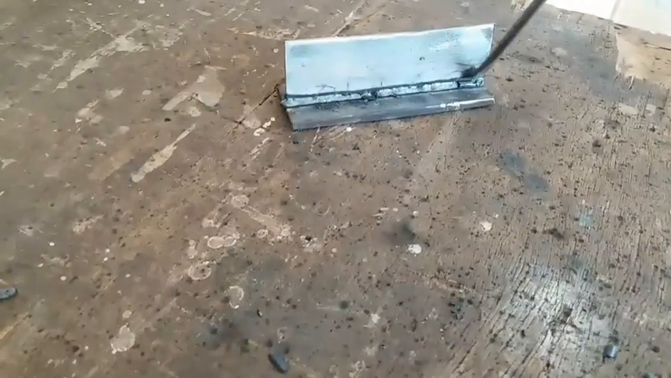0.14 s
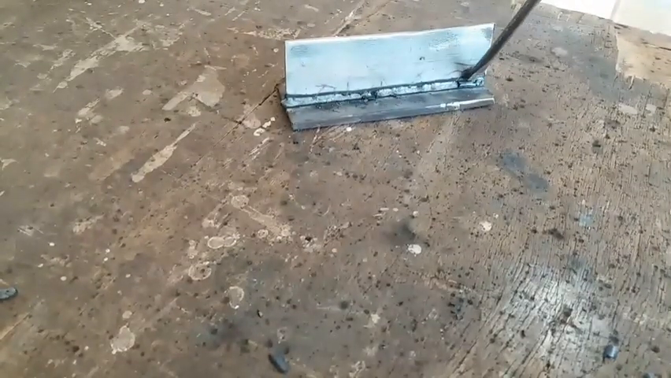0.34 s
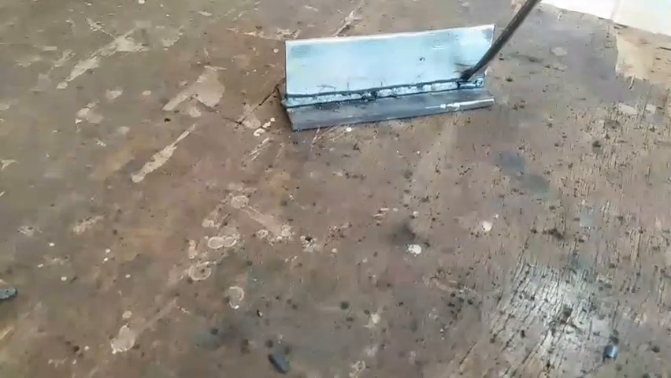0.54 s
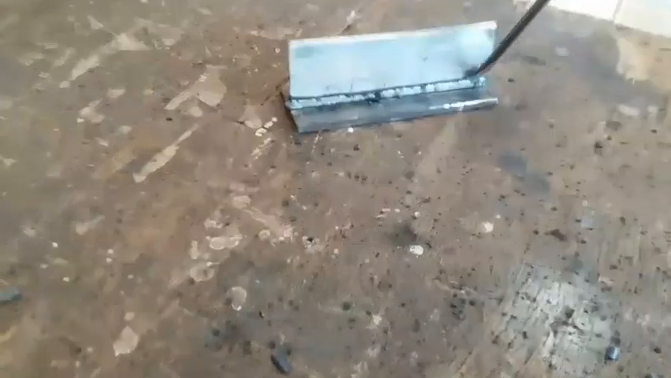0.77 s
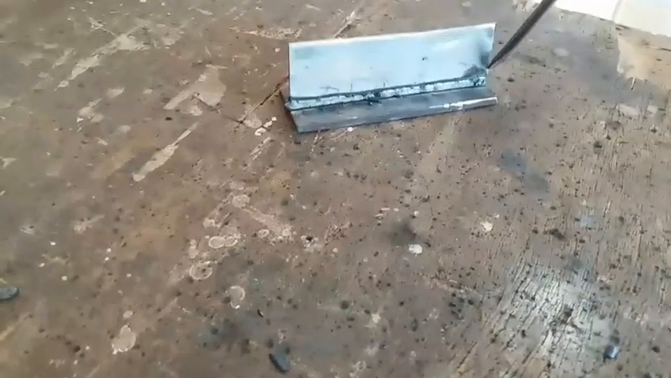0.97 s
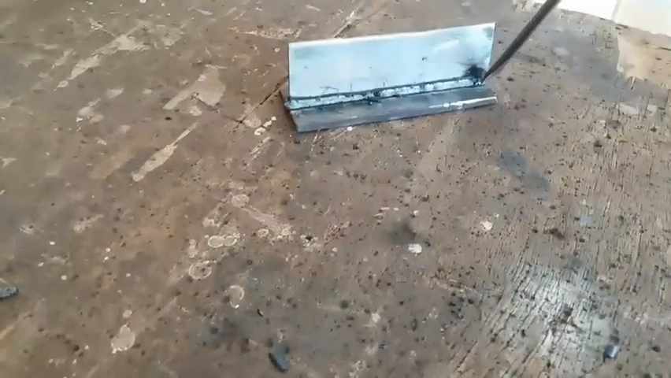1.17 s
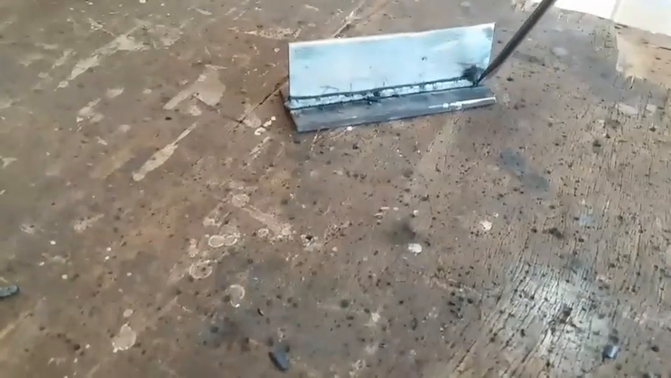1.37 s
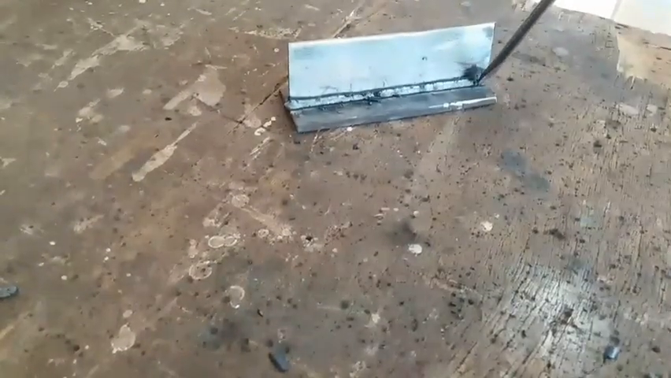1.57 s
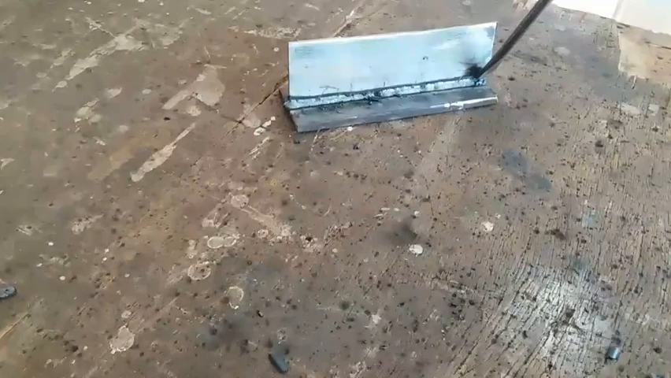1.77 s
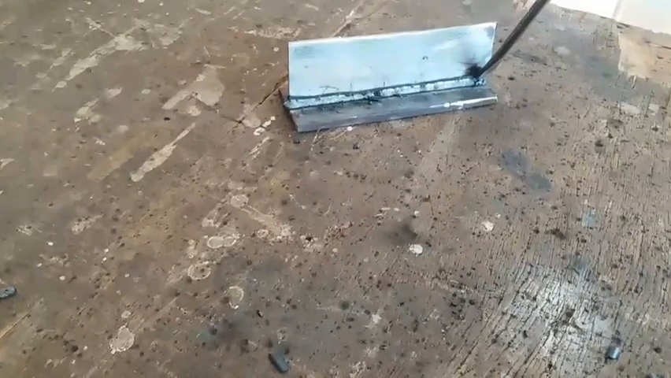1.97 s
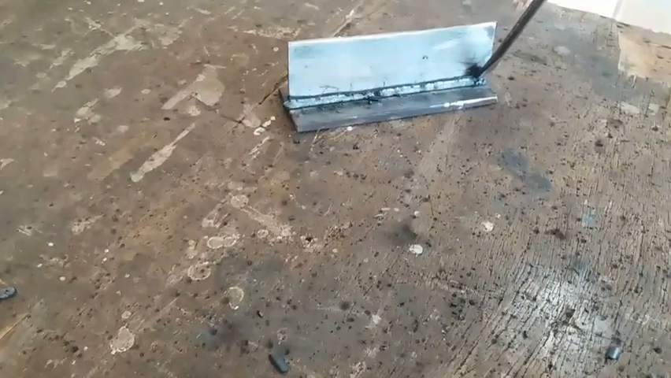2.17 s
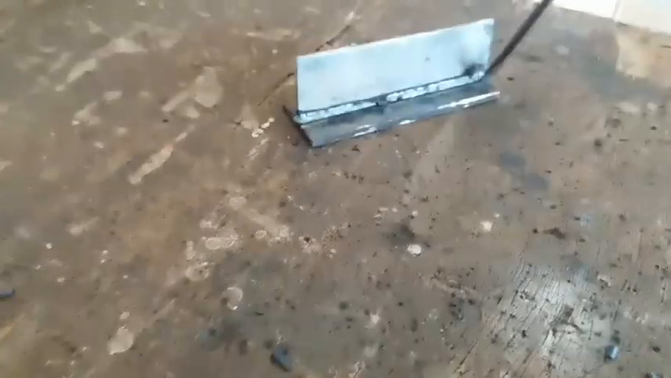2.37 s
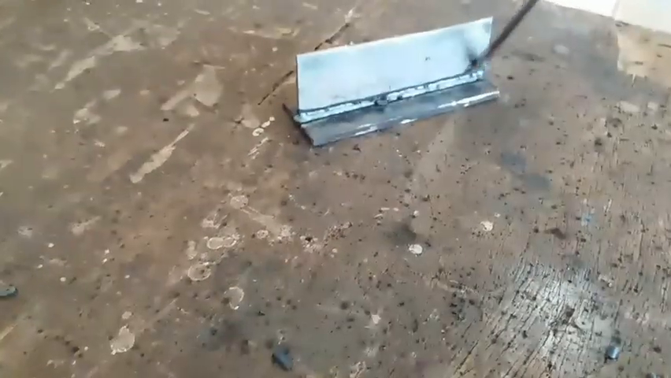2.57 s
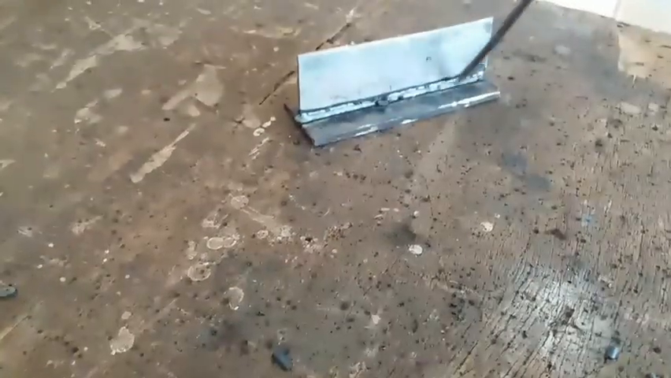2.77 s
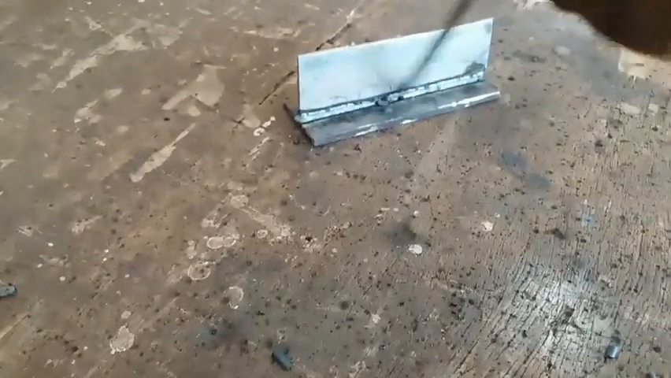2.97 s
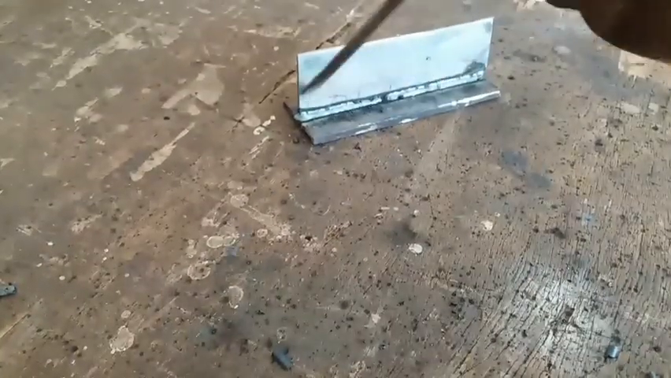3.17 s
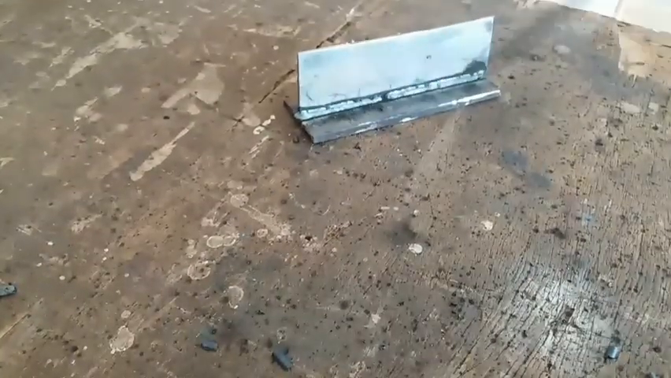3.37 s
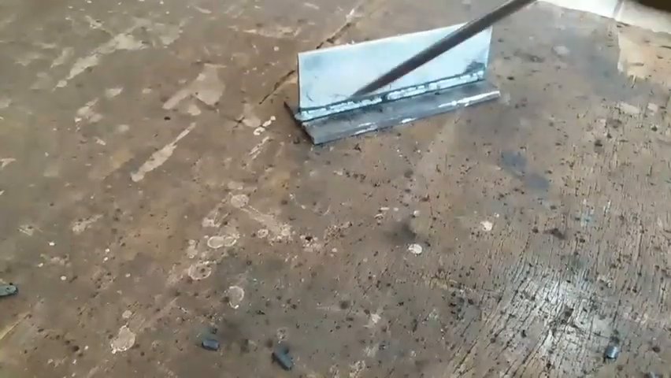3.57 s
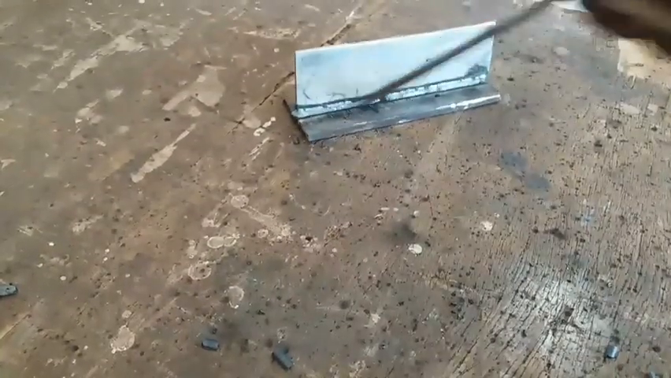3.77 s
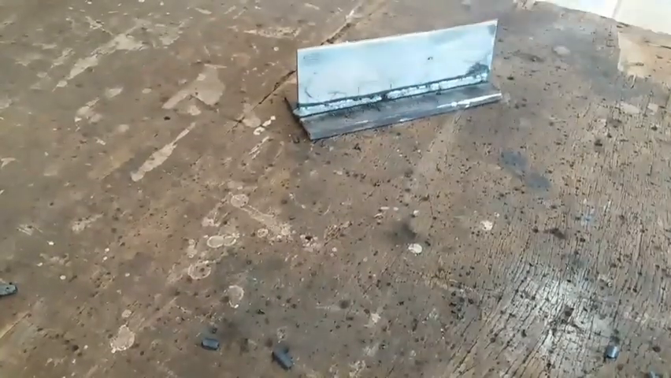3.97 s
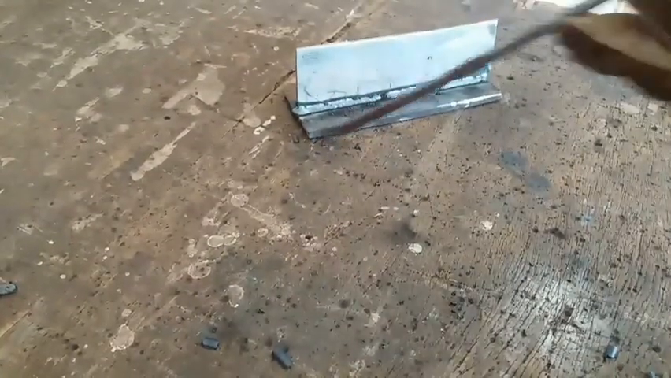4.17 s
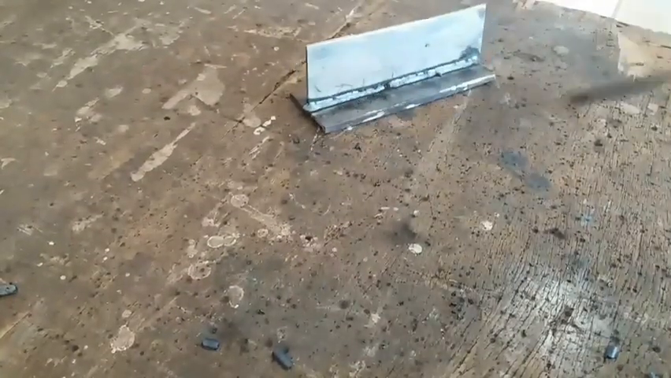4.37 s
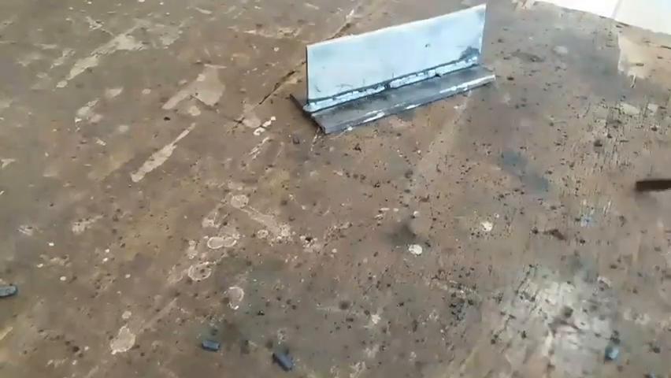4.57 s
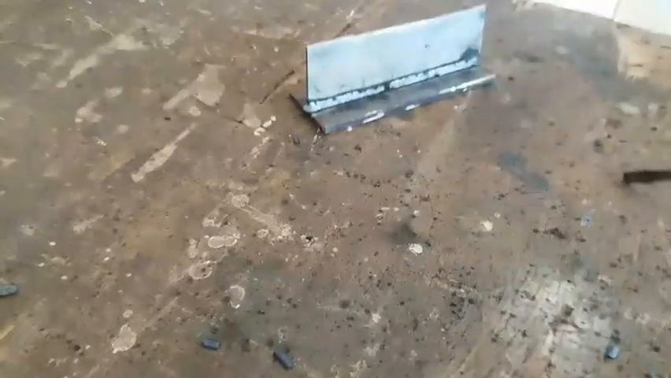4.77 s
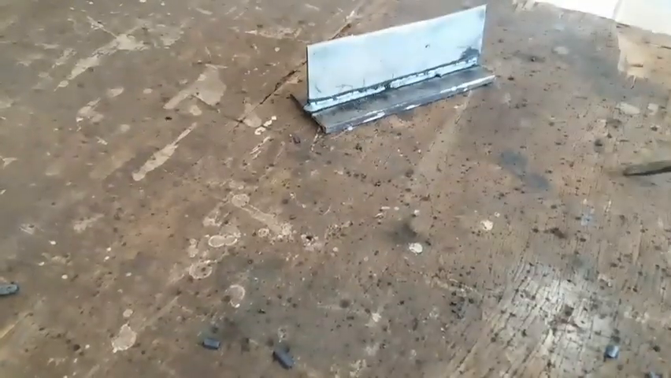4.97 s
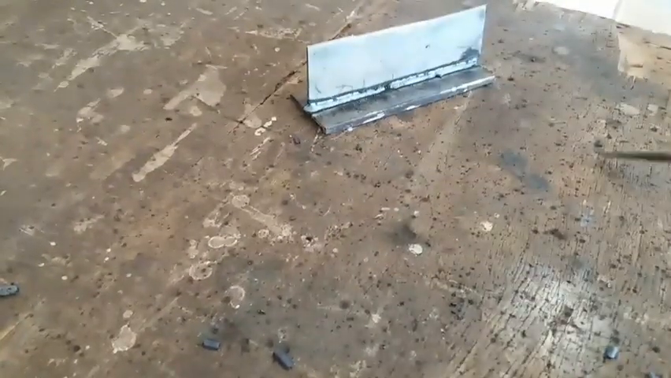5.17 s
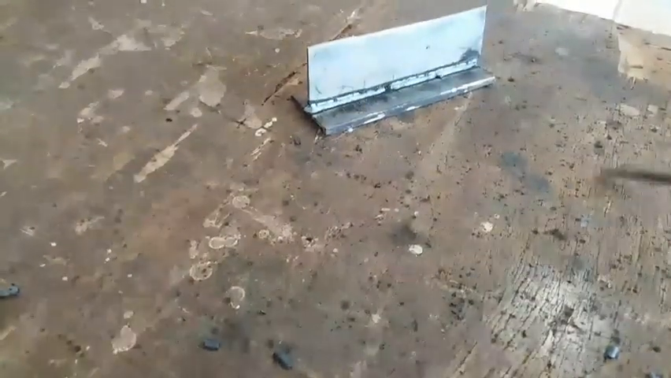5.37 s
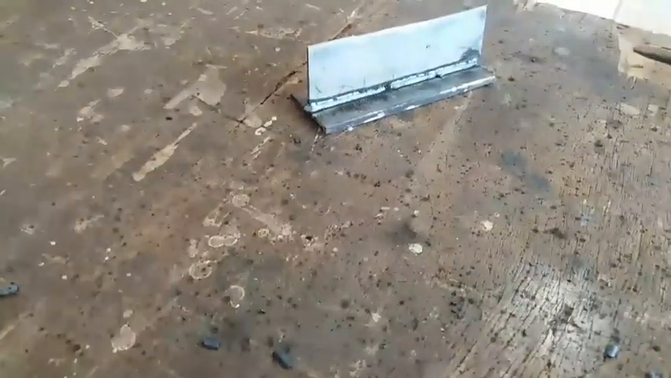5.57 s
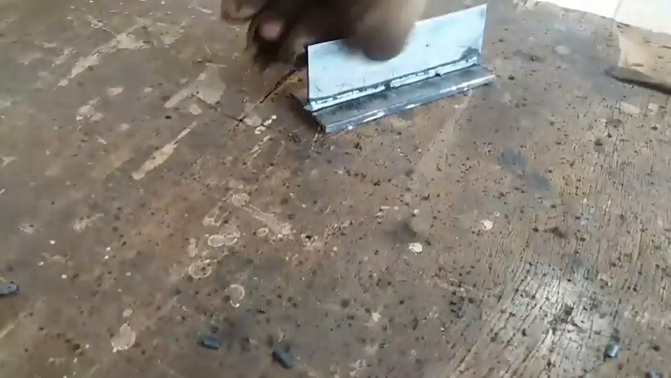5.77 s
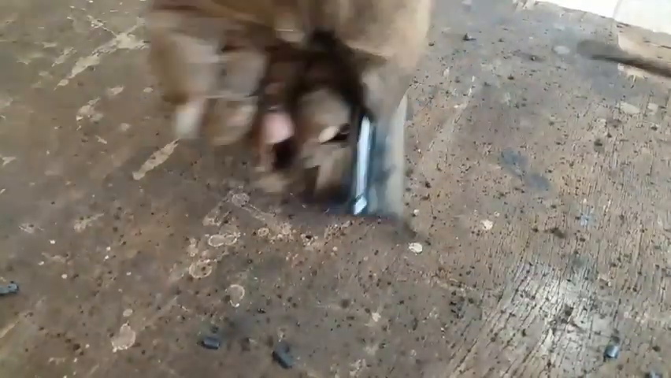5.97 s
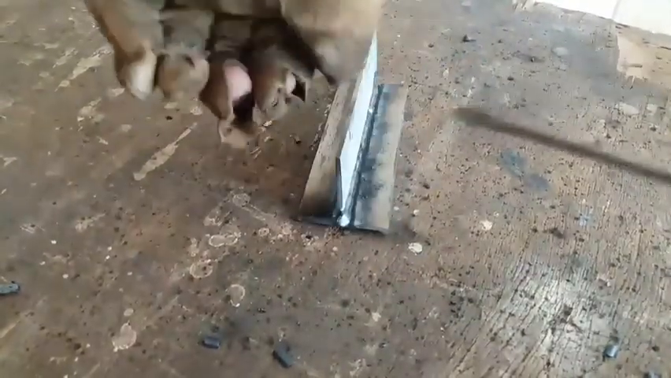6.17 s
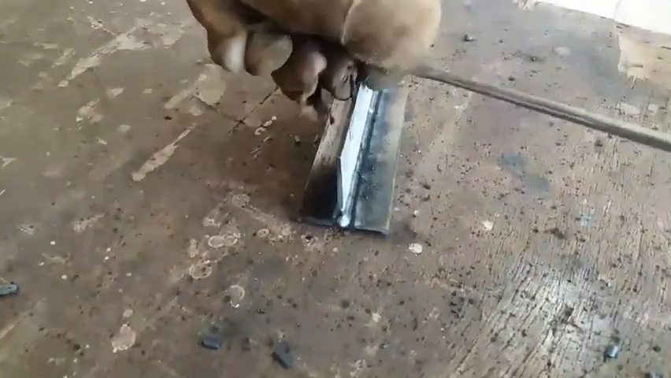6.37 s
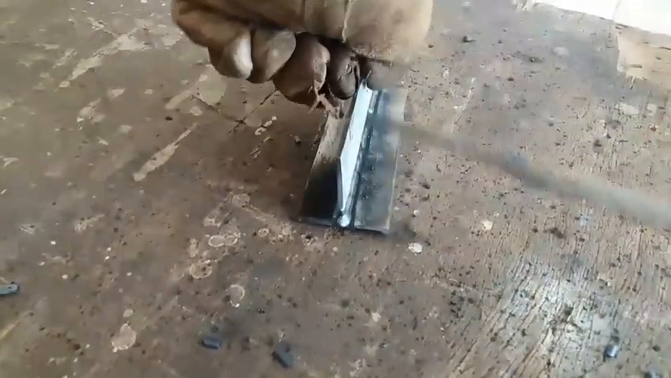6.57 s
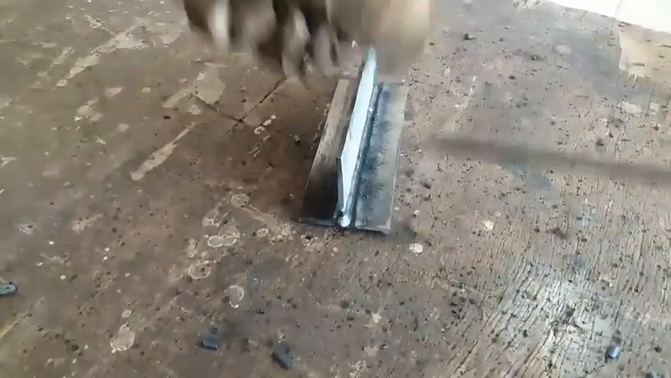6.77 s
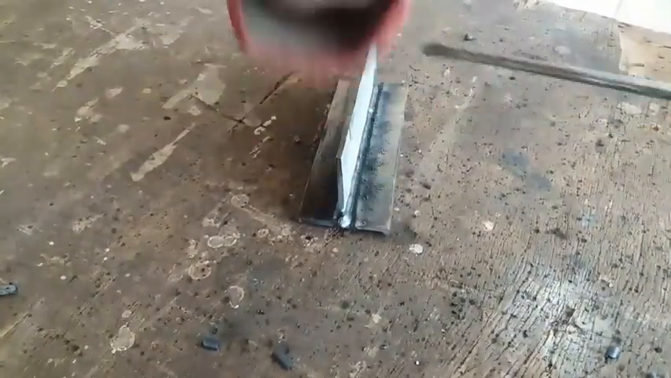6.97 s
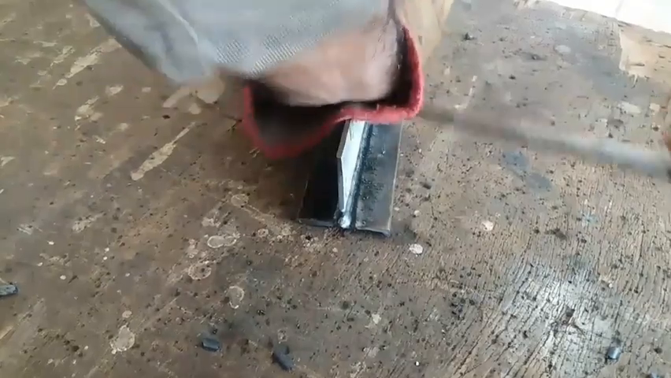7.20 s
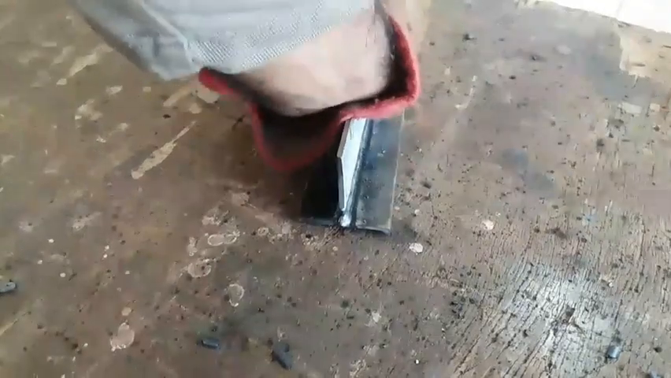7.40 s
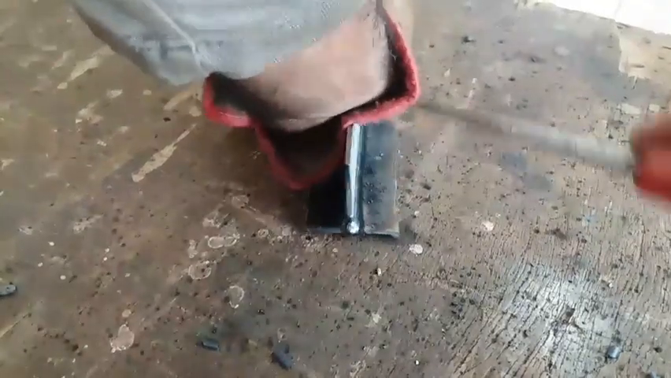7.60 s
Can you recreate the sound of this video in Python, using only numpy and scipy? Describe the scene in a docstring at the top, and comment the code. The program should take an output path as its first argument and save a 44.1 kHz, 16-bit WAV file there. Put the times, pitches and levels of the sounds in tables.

```python
"""A steel rod taps and scrapes slag from the weld of a small steel angle on a wooden bench, close to a phone.
Taps are resonant noise cracks plus impulses into bench modes; scrapes and rattles are grain noise under
pressure curves. Fluttering sines ring the angle and bench top, slag chips tick as short resonant noise, and
low sines sway the bench. Behind: workshop rumble, hiss and a thin electrical whine, heard at a varying level;
a room tail follows the work."""
import sys
import numpy as np
from scipy import signal
from scipy.fft import rfft, irfft, next_fast_len
from scipy.io import wavfile
from scipy.ndimage import map_coordinates

SR = 44100
rng = np.random.default_rng(int(sys.argv[2]) if len(sys.argv) > 2 else 0)


def transcribe(u):
    """Save the signal u as a 16-bit wav file named by the first command-line argument.

    u: samples, shape (n,) or (channels, n), limited to [-1, 1]; the rate is SR.
    q: integer samples, one column per channel.
    """
    v = np.clip(np.atleast_2d(u).T, -1, 1)
    q = np.round(v * 32767).astype(np.int16)
    wavfile.write(sys.argv[1], SR, q)


N = 336924


def amp(db):
    """Amplitude ratio of a level in dB."""
    return 10 ** (np.asarray(db) / 20)


def unit(x):
    """x scaled to an RMS of 1."""
    return x / np.sqrt(np.mean(x ** 2) + 1e-20)


def along(points, hz):
    """Interpolate (Hz, value) points on a log frequency axis."""
    f, v = np.transpose(points)
    return np.interp(np.log(hz + 1), np.log(f + 1), v)


def curves(rows):
    """One value per sample for each column after the time."""
    s, *cols = np.transpose(rows)
    return np.array([np.interp(np.arange(N) / SR, s, c) for c in cols])


def wobble(knots_per_s):
    """Smooth random curve through normal knots."""
    knots = rng.standard_normal(int(N * knots_per_s / SR) + 4)
    return map_coordinates(knots, [np.arange(N) * knots_per_s / SR])


def filtered(x, response):
    """x times a complex response of frequency."""
    m = next_fast_len(N + SR // 2)
    return irfft(rfft(x, m) * response(np.fft.rfftfreq(m, 1 / SR)), m)[..., :N]


def resonances(modes):
    """Causal response of (Hz, width Hz, dB) modes, signs alternating."""
    def response(f):
        total = 0
        for k, (hz, width_hz, db) in enumerate(modes):
            band = 1j * f * width_hz
            total = total + (-1) ** k * amp(db) * band / (hz * hz - f * f + band)
        return total
    return response


# Background level as heard at the phone over time, mean levels: (t/s, rumble level/dB, hiss level/dB)
SHOP_LEVELS = [(0, -56, -74.5), (.4, -48.5, -68), (.78, -52.5, -64.5), (1.1, -64.5, -78),
               (1.55, -63.5, -85.5), (2.3, -60.5, -79), (2.6, -58, -67.5), (3.7, -64, -78), (4.1, -51, -61),
               (4.6, -45.5, -54), (5.2, -47.5, -55), (6.35, -48.5, -57.5), (7.0, -50, -56),
               (7.64, -50, -61)]
# Rumble spectrum, relative: (f/Hz, level/dB per Hz)
RUMBLE_SPECTRUM = [(18, -60), (30, -4.5), (82, -5), (166, -14), (203, -22.5), (237, 2.5), (295, -23.5),
                   (318, -16.5), (475, -20.5), (555, -17), (1200, -48), (1560, -54.5), (2640, -120)]
# Hiss spectrum, relative: (f/Hz, level/dB per Hz)
HISS_SPECTRUM = [(470, -22), (800, 4.5), (1750, 0.5), (3060, -9), (5480, -13), (10900, -17.5), (11900, -17),
                 (12300, -20), (15500, -18.5), (16500, -34)]
WHINE_HZ, WHINE_RE_HISS_DB = 11600, -14.5


def shop():
    """Shaped noise gives far rumble and hiss; a phase-wandering sine whines at a level tied to the hiss."""
    rumble_db, hiss_db = curves(SHOP_LEVELS)
    noise = rng.standard_normal((2, N))
    peaks = resonances([(4300, 500, 0), (6300, 500, -3)])
    rumble = unit(filtered(noise[0], lambda f: amp(along(RUMBLE_SPECTRUM, f))))
    hiss = unit(filtered(noise[1], lambda f: amp(along(HISS_SPECTRUM, f)) * (1 + peaks(f))))
    phase = 2 * np.pi * WHINE_HZ * np.arange(N) / SR + 1.5 * wobble(25)
    whine = np.sqrt(2) * np.sin(phase)
    out = amp(rumble_db + 5.0 * wobble(3)) * rumble
    out += amp(hiss_db + 0.73 * wobble(6.7)) * hiss
    return out + amp(hiss_db + WHINE_RE_HISS_DB) * whine


# Workshop decay: (f/Hz, t60/s)
ROOM_DECAY = [(60, 0.17), (420, 0.36), (1500, 0.22), (5000, 0.2), (12000, 0.44)]


def room(x):
    """Each frequency of the workshop's answer dies at its own speed; a new noise tail every quarter second."""
    out, hop, delay = np.zeros(N + 2 * SR), SR // 4, 200  # samples
    for start in range(0, N, hop):
        hz, t, z = signal.stft(rng.standard_normal(SR // 2), SR, nperseg=256)
        decay = amp(-60 * t / along(ROOM_DECAY, hz)[:, None])
        tail = signal.istft(z * decay, SR, nperseg=256)[1]
        wet = signal.fftconvolve(x[start:start + hop], tail / np.linalg.norm(tail))
        out[start + delay:][:len(wet)] += wet
    return out[:N]


# Blows that rock the whole bench: (t/s, level/dB)
BOOM_BLOWS = [(0.791, -28), (2.342, -21), (4.687, -17.5), (4.774, -20.5), (4.831, -29), (5.26, -44)]
# Bench frame modes: (f/Hz, level/dB re blow, t60/s)
FRAME_MODES = [(47, -8, 1), (69.2, -5, 0.87), (89.5, 6, 0.39)]


def booms():
    """The bench frame sways after a blow: decaying low sines with wandering phase."""
    out, t = np.zeros(N + SR), np.arange(SR) / SR
    for s, db in BOOM_BLOWS:
        for hz, mode_db, t60 in FRAME_MODES:
            sway = np.sin(2 * np.pi * hz * t + 1.2 * wobble(18)[:SR])
            out[round(s * SR):][:SR] += amp(db + mode_db - 60 * t / t60) * sway
    return out[:N]


# Loose slag chips on steel: (t/s, peak level/dB)
CHIP_TICKS = [(0.829, -23.5), (0.8452, -31), (0.8799, -35.5), (0.9013, -38), (2.381, -29.5), (2.418, -38),
              (2.449, -40), (2.481, -41.5), (3.7459, -40.5), (4.8354, -17), (4.8544, -30), (4.8733, -31.5),
              (4.8971, -29.5), (4.9289, -37.5), (4.9846, -44.5), (5.9545, -33.5), (6.128, -21.5)]
CHIP_HZ, CHIP_SPREAD_RATIO, CHIP_T60_S = 9600, 0.22, 0.026


def chips():
    """Each chip is a short bright tick: decaying noise through a resonance at its own pitch."""
    out, t = np.zeros(N + SR), np.arange(SR // 50) / SR
    for s, db in CHIP_TICKS:
        tick = amp(-60 * t / CHIP_T60_S) * rng.standard_normal(len(t))
        hz = np.clip(CHIP_HZ * (1 + CHIP_SPREAD_RATIO * rng.standard_normal()), 5000, 14000)
        for _ in range(2):
            tick = signal.lfilter(*signal.iirpeak(hz, 1.6, SR), tick)
        out[round(s * SR):][:len(t)] += amp(db) * tick / np.abs(tick).max()
    return out[:N]


# Long-ringing modes, lowest of the bench top, rest of the angle: (f/Hz)
MODE_HZ = [234, 2293, 2692, 3138, 3806, 4285, 5464, 5750, 5959, 6272, 7630, 8371, 8650, 9819, 11350]
# Same modes: (t60/s, level lying flat/dB, level tipped up/dB)
MODE_DECAYS = [(0.14, 1, -28.5), (0.44, -7.5, -4), (0.41, 0.5, -14), (0.27, -35.5, 0.5), (.6, -13, -13),
               (0.21, -35.5, 4), (0.44, -34.5, 2), (0.34, -4.5, 0), (0.16, -30, -8), (0.15, -34.5, -4.5),
               (0.18, -29, -1), (0.18, -8.5, -11.5), (0.16, -29.5, -1), (0.3, -6, -19), (0.37, -31, -4.5)]
# Loss per octave between mode and favoured pitch: (lying flat/dB, tipped up/dB)
LOSS_PER_OCTAVE_DB = 35, 17
# Angle rocked up off the bench: (from t/s, to t/s)
TIPPED_SPANS = [(4.66, 4.76), (5.88, 6.148)]
# Rings of angle or bench top after blows, one blow may have several rows:
# (t/s, level/dB, favoured f/Hz, time before extra damping/s)
RING_ROWS = [(.064, -50, 2692, 0.17), (0.338, -28, 234, .11), (.8, -29.5, 5750, 0.39),
             (.81, -17.5, 2650, 0.14), (.82, -28, 2200, 0.22), (1.839, -43, 234, 0.063),
             (2.35, -25, 3775, .45), (2.774, -54, 2692, 0.024), (2.946, -59, 2692, 0.089),
             (3.15, -59, 2140, .25), (3.234, -36, 3760, 0.14), (3.237, -55, 9200, .1),
             (3.445, -42, 2300, 0.33), (3.5, -56, 3806, .2), (3.724, -31.5, 2692, 0.015),
             (3.744, -22, 3806, 0.022), (3.81, -28.5, 2692, 0.018), (3.88, -39, 2692, 0.19),
             (3.977, -37, 9819, 0.063), (3.979, -40, 2692, 0.13), (4.234, -12, 234, 0.019),
             (4.3, -27.5, 2692, 0.08), (4.42, -31, 2150, 0.19), (4.694, -24.5, 3138, 0.044),
             (5.915, -32.5, 7600, 0.11), (5.993, -31.5, 6800, 0.076), (6.074, -27, 5900, 0.072),
             (6.146, -37.5, 3370, 0.2), (6.15, -32.5, 3806, 0.42), (6.555, -14, 234, 0.077),
             (7.177, -4, 234, 0.081)]
RING_ATTACK_S, DAMPED_T60_S = 0.0085, 0.13


def sings():
    """Each row rings the modes near its pitch as decaying sines, then damps them; level and phase flutter."""
    out, t = np.zeros(N), np.arange(SR // 2) / SR
    for hz, (t60, flat_db, tipped_db) in zip(MODE_HZ, MODE_DECAYS):
        envelope = np.zeros(N + SR)
        for s, db, favoured_hz, undamped_s in RING_ROWS:
            tipped = any(start < s < end for start, end in TIPPED_SPANS)
            mode_db = tipped_db if tipped else flat_db
            level_db = db + mode_db - LOSS_PER_OCTAVE_DB[tipped] * abs(np.log2(hz / favoured_hz))
            damping_db = -60 * t / t60 - 60 * np.maximum(t - undamped_s, 0) / DAMPED_T60_S
            attack = 1 - np.exp(-t / RING_ATTACK_S)
            envelope[round(s * SR):][:len(t)] += amp(level_db + damping_db) * attack
        flutter = amp(2.2 * wobble(45))
        phase = 2 * np.pi * hz * np.arange(N) / SR + 0.72 * wobble(40)
        out += envelope[:N] * flutter * np.sin(phase)
    return out


# Rattles, abrupt scrape onsets and a slide tail, sudden start then dying away, levels before STROKES_DB:
# (t/s, grit level/dB, bench shake level/dB, treble level/dB re grit, 20 dB shake decay/s)
SUDDEN_EVENTS = [(.791, -19.5, -10.5, -18, 0.14), (2.341, -23.5, -6, -16.5, 0.1239),
                 (3.24, -51, -46.5, -29, 0.39), (3.325, -49.5, -36, -25, 0.14),
                 (3.73, -33, -20.5, -10, 0.1142), (4.234, -27, -16, -44, 0.0943),
                 (4.292, -28, -30.5, -8.5, 0.09), (4.688, -24, -9.5, -5, 0.115),
                 (4.772, -23, -10, -6.5, 0.0317), (4.82, -26.5, -12, -6.5, 0.0958),
                 (4.93, -48, -34.5, -17, .5), (5.25, -50.5, -43, -17, 0.1), (5.348, -46, -35, -14, 0.3),
                 (6.552, -27, -26.5, -5, 0.3037), (6.669, -21, -25, -2.5, 0.0878),
                 (7.176, -38.5, -27, -4.5, 0.33)]
# Rod, glove or angle dragged along, levels before STROKES_DB:
# (peak t/s, grit level/dB, bench shake level/dB, treble level/dB re grit, 20 dB grit rise/s, 20 dB grit fall/s)
SCRAPE_EVENTS = [(3.1, -44, -42, -28, 0.11, 0.06), (3.445, -41.5, -49, -8, 0.1341, 0.11),
                 (3.924, -20.5, -25.5, -6.5, 0.0933, 0.1034), (4.37, -17.5, -23.5, -8.5, 0.0785, 0.0872),
                 (4.435, -32.5, -17.5, -12, 0.0569, 0.0837), (5.68, -49.5, -48.5, -2, 0.52, 0.78),
                 (5.95, -37.5, -20.5, -7, 0.0838, 0.1337), (6.098, -37.5, -21.5, -8, 0.1825, 0.16),
                 (6.769, -13, -19, -6, 0.1039, 0.0429), (7.385, -18.5, -26, -1, 0.1149, 0.0475),
                 (7.445, -23.5, -26, -3, 0.03, 0)]
SUDDEN_BEND, RISE_BEND, FALL_BEND = 1.43, 1.7, 1.4  # powers of time in the dB loss
GRIT_PER_SUDDEN_DB, SHAKE_PER_SCRAPE_DB = 1.23, 0.99  # dB per dB
TREBLE_PER_GRIT_DB = 1.15  # dB per dB: harder pressure is brighter
LIFT_S = 0.021  # past its fall the tip leaves the steel: time to lose 60 dB more


def pressure():
    """Levels of grit, shake and sizzle: sudden events start at once and die, scrapes swell, fall and lift."""
    levels, t = np.zeros((3, N)), np.arange(N) / SR

    def add(grit_db, shake_db, treble_db, grit_loss_db, shake_loss_db):
        """Add one event where it is not negligible."""
        near = shake_loss_db > -150
        grit_loss, shake_loss = grit_loss_db[near], shake_loss_db[near]
        sizzle_db = grit_db + treble_db + TREBLE_PER_GRIT_DB * grit_loss
        levels[:, near] += amp([grit_db + grit_loss, shake_db + shake_loss, sizzle_db])

    for s, *db, decay_s in SUDDEN_EVENTS:
        loss_db = np.where(t < s, -np.inf, -20 * (np.abs(t - s) / decay_s) ** SUDDEN_BEND)
        add(*db, GRIT_PER_SUDDEN_DB * loss_db, loss_db)
    for s, *db, rise_s, fall_s in SCRAPE_EVENTS:
        rise = (np.abs(t - s) / rise_s) ** RISE_BEND
        fall = (np.abs(t - s) / fall_s) ** FALL_BEND
        loss_db = -20 * np.where(t < s, rise, fall)
        lift_db = -60 * np.maximum(t - s - fall_s, 0) / LIFT_S
        add(*db, loss_db + lift_db, SHAKE_PER_SCRAPE_DB * loss_db)
    return levels


def grains(grains_per_s, spread_db):
    """Slag grains breaking at random: signed impulses up to twice spread_db apart in size."""
    chance, size, sign = rng.random(N), rng.exponential(size=N), rng.standard_normal(N)
    return unit((chance < grains_per_s / SR) * amp(spread_db * np.minimum(size, 2)) * np.sign(sign))


# Grit spectrum, relative: (f/Hz, level/dB per Hz)
GRIT_SPECTRUM = [(410, -25.5), (700, -9), (1070, 4.5), (1940, 10), (4010, 3.5), (4820, 0.5), (14500, -34),
                 (15900, -26), (16500, -39.5)]
# Short rings, angle lying loose: (f/Hz, width/Hz, level/dB)
LOOSE_MODES = [(1870, 230, 0), (2766, 190, 2.5), (3250, 290, 0.5), (4412, 250, 4.5), (6220, 370, -0.5),
               (8110, 400, -1.5), (10100, 700, -3)]
# Short rings, angle gripped by the glove: (f/Hz, width/Hz, level/dB)
HELD_MODES = [(1290, 83, -6.5), (2390, 130, 0), (3444, 800, -4), (4300, 460, -0.5), (4940, 380, -2),
              (6700, 400, -3), (7070, 520, -7), (10600, 5700, -4)]
# Bench modes: (f/Hz, width/Hz, level/dB)
BENCH_MODES = [(117, 46, -9.5), (172.4, 22, -2.5), (236.9, 14.9, 3), (293.4, 48.3, -4), (325, 31.9, -1.5),
               (483.5, 63.5, -9.5), (729, 26, -17.5), (836.4, 12, -14.5), (1190, 310, -24)]
# Upper board modes under a hard knock: (f/Hz, width/Hz, level/dB)
HOLLOW_MODES = [(732, 90, -0.5), (835, 69, 1), (970, 180, -7.5), (1770, 200, -9)]
GRIP_S = 6.45  # gripped from here on
SING_DB, SLIDE_DAMPS_RATIO = 11, 2.5  # rings stirred by grit; how much wider contact makes them
STROKES_DB = -3.5


def strokes():
    """One stream of grains makes the grit and its sizzle; a second one shakes the bench."""
    grit, shake, sizzle = pressure()
    bite = grit / (grit + amp(-48.5))  # a light touch only hisses, pressure breaks grains
    slag = grains(850, spread_db=3.5)
    skips = amp(1.3 * wobble(70))  # the tip skips over the ripples of the bead
    rough = bite * skips * slag + (1.3 - bite) * rng.standard_normal(N)

    def below(f):
        """Share left to grit; the rest is sizzle."""
        return 1 / (1 + (f / 6000) ** 8)

    voices = []
    for modes in LOOSE_MODES, HELD_MODES:
        colour = lambda f: amp(along(GRIT_SPECTRUM, f)) * (0.15 + 1.3 * resonances(modes)(f))
        low = unit(filtered(rough, lambda f: colour(f) * below(f)))
        high = unit(filtered(rough, lambda f: colour(f) * (1 - below(f))))
        voices.append(grit * low + sizzle * high)
    loose, held = voices

    # grains ring the loose angle
    steel = [(hz, 1.8 / t60 * SLIDE_DAMPS_RATIO, flat_db)
             for hz, (t60, flat_db, _) in zip(MODE_HZ[1:], MODE_DECAYS[1:])]
    drive = (grit + sizzle) * unit(rough)
    ringing = filtered(drive, lambda f: amp(along(GRIT_SPECTRUM, f)) * resonances(steel)(f))
    loose += amp(SING_DB) * ringing

    knocks = grains(150, spread_db=1) + 0.51 * rng.standard_normal(N)
    knocks = filtered(knocks, lambda f: resonances(BENCH_MODES)(f) + 0.1 * resonances(HOLLOW_MODES)(f))
    knocks = filtered(knocks, lambda f: (1j * f / (1j * f + 90)) ** 2)  # bench shake is kept free of deep bass
    voice = np.where(np.arange(N) / SR > GRIP_S, held, loose)
    return amp(STROKES_DB) * (voice + shake * unit(knocks))


# Contacts, crack before steel colour, thud and knock before bench gain:
# (t/s, crack peak level/dB, thud level/dB re crack, hollow knock level/dB re crack, crack centre f/Hz)
TAP_CONTACTS = [(0.0637, -33, -3, -11, 2230), (0.1812, -41.5, -6, -21, 1520), (0.3314, -47, 15.5, -9, 1590),
                (0.7897, -1, -13, 2, 2180), (0.8318, -17, 8, -16, 2687), (1.068, -31, -28, -24.5, 3310),
                (1.1107, -39.5, -15.5, -17.5, 4050), (1.2334, -49.5, 1, 1, 1620),
                (1.4065, -58, 9.5, -3, 2090), (1.835, -72, 34, 14, 1680), (2.34, -10.5, 1.5, 8.5, 2360),
                (2.687, -49.5, -2, -3, 2270), (2.7716, -41, 5.5, 3.5, 2600), (2.9463, -41.5, 7.5, 3, 2700),
                (3.0504, -33, -10.5, -30, 1800), (3.0844, -27, -17, -33, 2190),
                (3.1048, -23.5, -10, -44, 1740), (3.236, -37, -6, 0, 3740), (3.3253, -37, 7.5, -8, 2860),
                (3.441, -19.5, -10.5, -15, 1910), (3.4592, -22.5, -24, -40, 5530),
                (3.725, -30.5, -11, 3, 2710), (3.8085, -13, -29, -13.5, 2450), (3.8963, -6, -21, -18, 2830),
                (3.914, -9.5, -17.5, -21, 4230), (3.946, -9, -22, -17, 2850),
                (3.976, -7, -12.5, -15.5, 1950), (4.2324, -24, 5, 5.5, 2670),
                (4.398, -7.5, -69, -9.5, 1940), (4.6749, -17, 4, -21, 1930), (4.6937, -4.5, -8.5, -5, 3600),
                (4.7701, -5.5, 6, -36, 3400), (4.818, -8.5, -1, -7, 3350), (5.2471, -33.5, -2, 1, 1980),
                (5.3802, -24, -1, -12, 513), (5.4163, -34, -5, -9, 517), (5.4643, -21.5, -5.5, -2, 780),
                (5.9105, -14, -41, -31, 4040), (5.9216, -14, -23, -7.5, 4200), (5.9953, -15, 4.5, -2, 5330),
                (6.0723, -7, -0.5, -5, 5600), (6.1087, -13, 0, -9, 5700), (6.1429, -15.5, 3, -65, 6000),
                (6.4002, -38, 4.5, 9, 3760), (6.55, -4, -35, -53, 2700), (6.587, -7.5, -10.5, -33.5, 3000),
                (6.637, -6.5, -39, -38, 2620), (6.6685, -4, -26, -17, 4430), (6.7169, 4, -34, -30, 4800),
                (7.1746, -1.5, -8, -25, 4150), (7.3774, -2, -37, -41, 4160), (7.389, 0.5, -30, -17, 3480),
                (7.414, -3, -37, -25, 3160)]
THUD_GAIN_DB, KNOCK_GAIN_DB = 48.5, 35.0


def taps():
    """Every contact cracks briefly around its own pitch, pushes the bench and knocks its boards."""
    cracks, pushes, t = np.zeros(N + SR), np.zeros((2, N)), np.arange(SR // 8) / SR
    for s, db, thud_db, knock_db, centre_hz in TAP_CONTACTS:
        decay = amp(-60 * t / 0.019) + 0.16 * amp(-60 * t / 0.19)
        burst = decay * rng.standard_normal(len(t))
        burst[:2] += 2.5  # the sharp front of the blow
        q = 0.51 + 0.07 * max(-db - 30.5, 0)  # light touches excite a narrower band
        for _ in range(2):
            burst = signal.lfilter(*signal.iirpeak(centre_hz, q, SR), burst)
        cracks[round(s * SR):][:len(t)] += amp(db) * burst / np.abs(burst).max()
        pushes[:, round(s * SR)] = amp(db + thud_db + THUD_GAIN_DB), amp(db + knock_db + KNOCK_GAIN_DB)

    def coloured(modes):
        """Cracks coloured by the steel; steel on slag is never quite sharp."""
        soft = lambda f: 1 / (1 + 1j * f / 9000) ** 2
        rings = lambda f: sum(resonances([mode])(f) for mode in modes)
        return filtered(cracks[:N], lambda f: soft(f) * (0.72 + 0.31 * rings(f)))

    def padded(push, modes, top_hz):
        """Wood yields, so a push has little treble."""
        return filtered(push, lambda f: resonances(modes)(f) / (1 + 1j * f / top_hz) ** 2)

    crack = np.where(np.arange(N) / SR > GRIP_S, coloured(HELD_MODES), coloured(LOOSE_MODES))
    return crack + padded(pushes[0], BENCH_MODES, 410) + padded(pushes[1], HOLLOW_MODES, 1600)


def scene():
    """Work and rings, their room tail, bench sway and the workshop."""
    work, rings = taps() + strokes() + chips(), sings()
    tail = amp(-13.0) * room(work + 0.33 * rings)
    return (work + rings + tail + booms() + shop())[None]


TOP_HZ = 15900


def record(dry):
    """The phone rounds off the highest peaks, loses the deepest bass and keeps nothing above TOP_HZ."""
    rounded = dry / (1 + np.abs(dry / .86) ** 4) ** .25
    return filtered(rounded, lambda hz: (hz < TOP_HZ) * (1j * hz / (1j * hz + 30)) ** 4)


dry = scene()
out = record(dry)
transcribe(out)
```